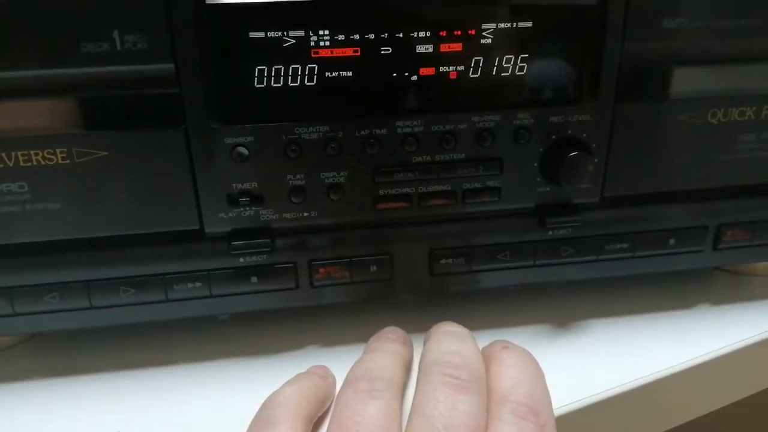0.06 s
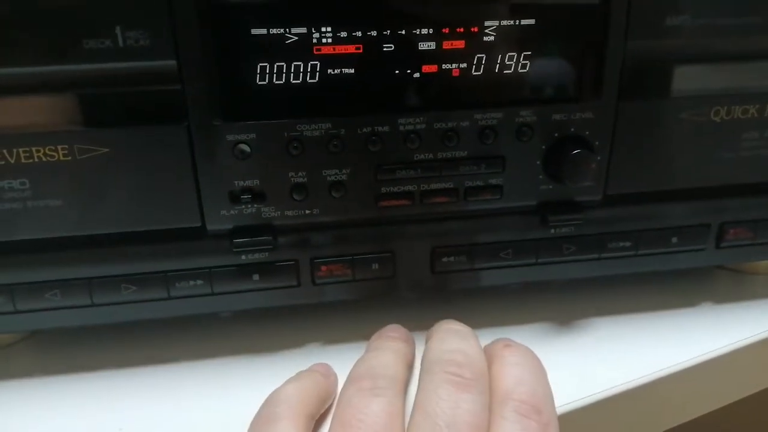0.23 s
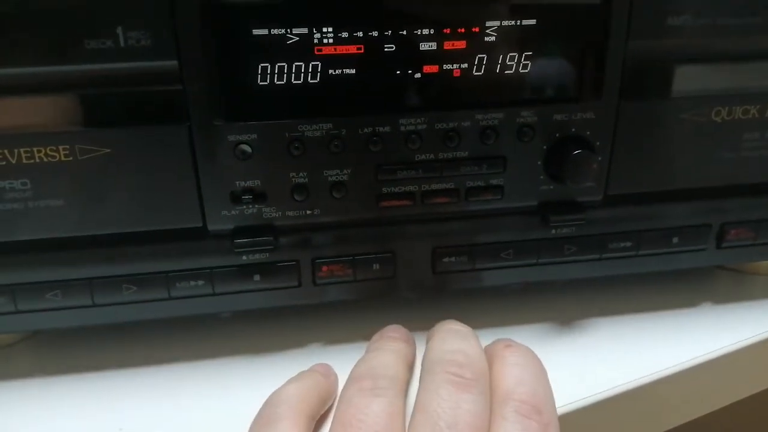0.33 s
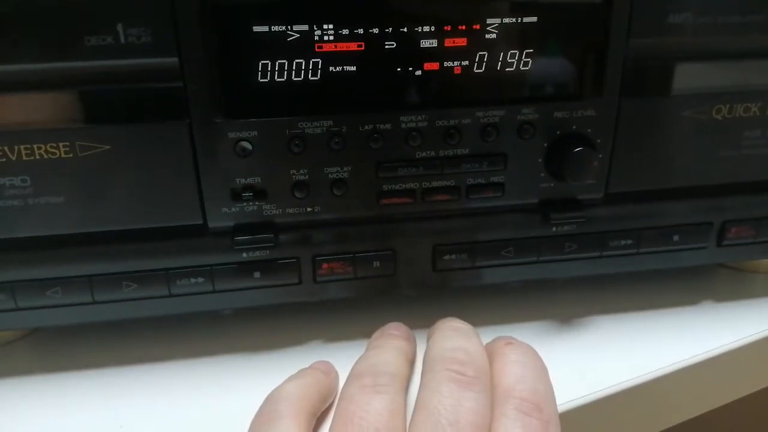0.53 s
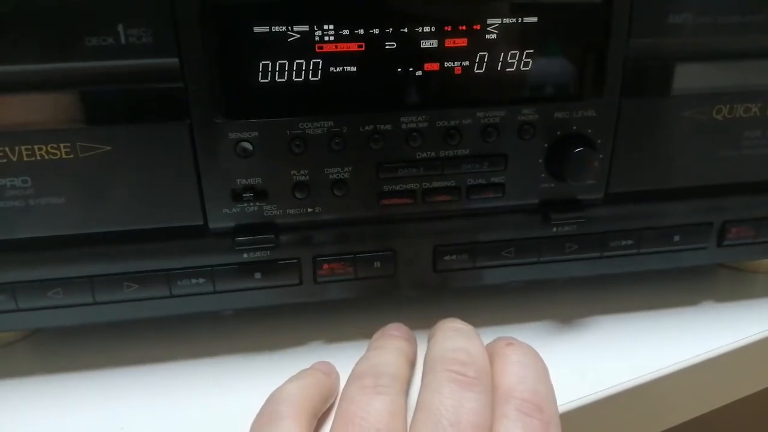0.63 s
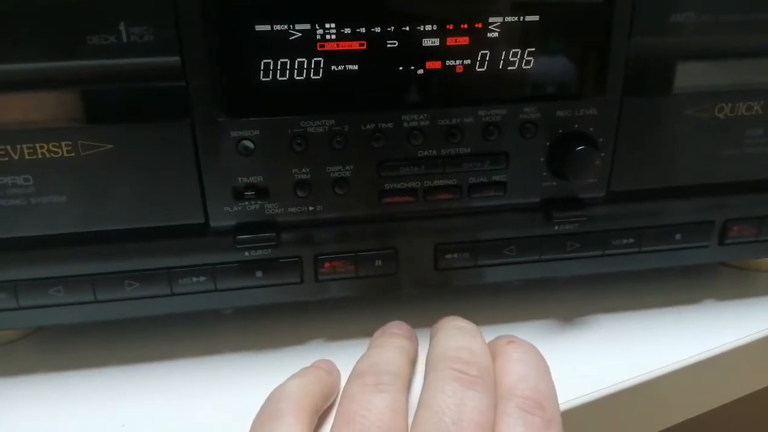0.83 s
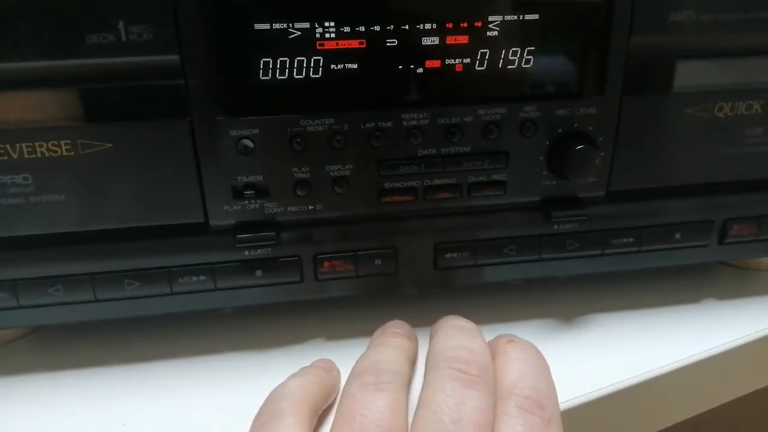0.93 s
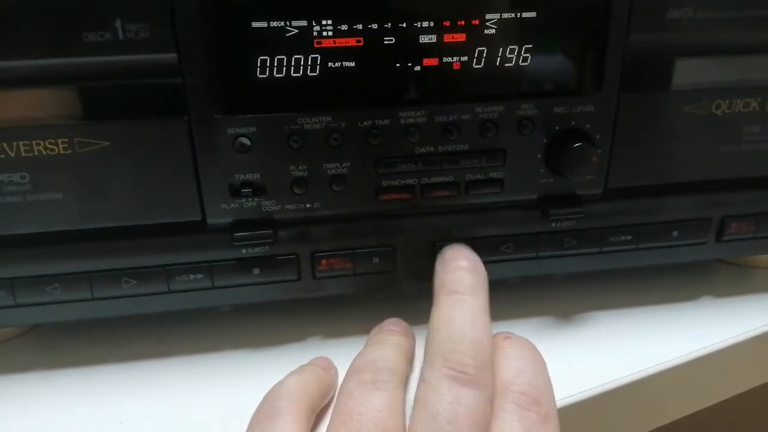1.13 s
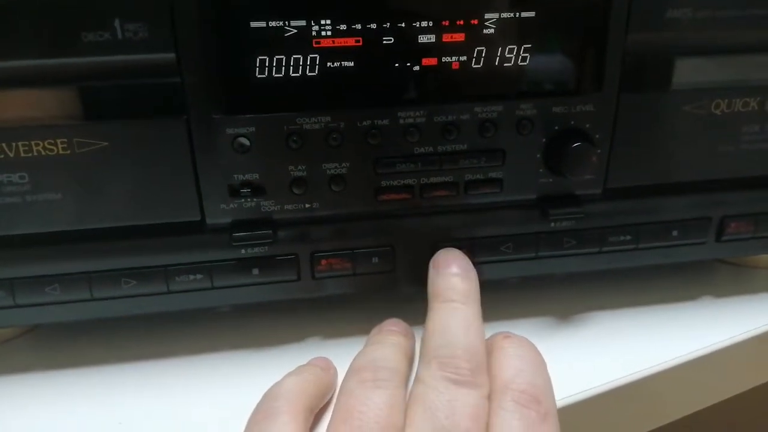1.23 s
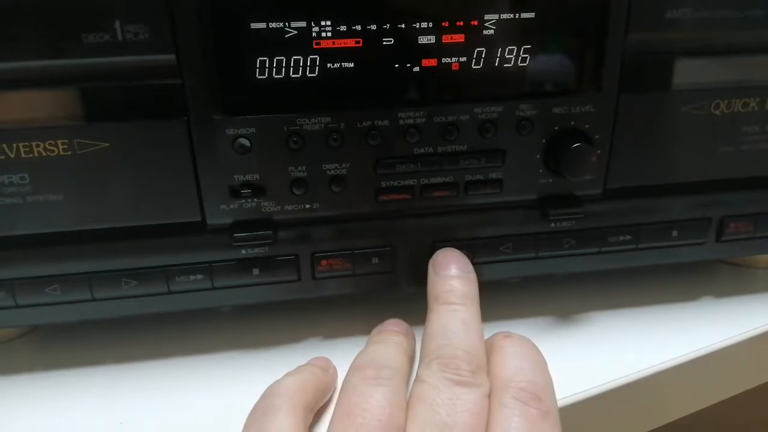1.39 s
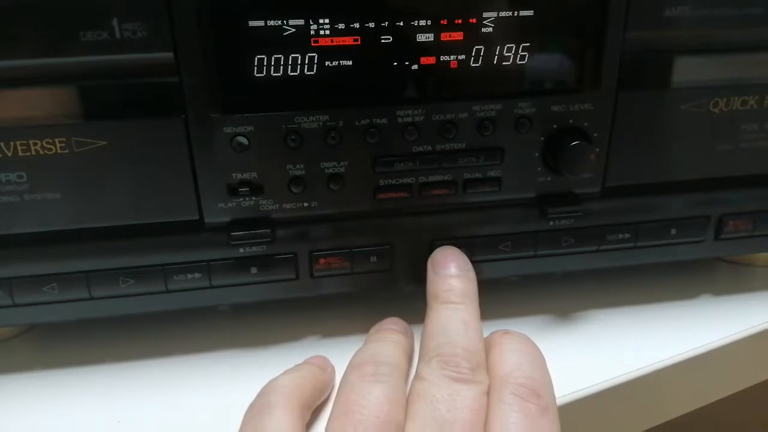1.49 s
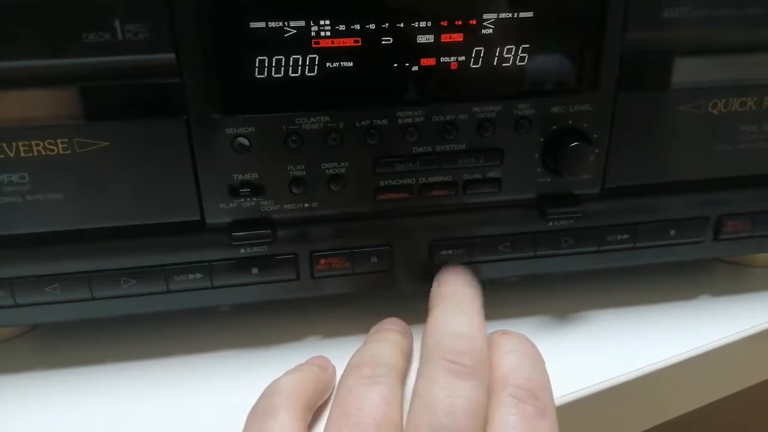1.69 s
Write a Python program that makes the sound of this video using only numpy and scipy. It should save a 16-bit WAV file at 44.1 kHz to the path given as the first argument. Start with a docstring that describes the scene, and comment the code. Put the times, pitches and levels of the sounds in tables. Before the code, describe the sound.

Two clacks of a cassette deck mechanism stopping, followed by a small plastic button click.

```python
"""A cassette deck close to the microphone, in a small hard room, over a low rumble and a hiss.
First the winding transport ticks. It stops with a clack, a rattle of levers and a second clack:
impacts that set the steel chassis ringing, then clamp it. The reels run down, their whirr falling
in pitch, and a motor hums on. Last, a finger presses a small plastic button and lets it go;
each stroke excites the modes of the front panel."""
import sys
import numpy as np
from scipy import signal
from scipy.fft import rfft, irfft, next_fast_len
from scipy.io import wavfile
from scipy.ndimage import map_coordinates

SR = 44100
rng = np.random.default_rng(int(sys.argv[2]) if len(sys.argv) > 2 else 0)


def materialize(psi):
    """Save the field psi as 16-bit PCM at rate SR to the path in sys.argv[1].

    A 1-D psi becomes a single channel; in a 2-D psi each row is a channel.
    """
    bounded = np.clip(np.atleast_2d(psi).T, -1, 1)
    quanta = np.round(bounded * 32767).astype(np.int16)
    wavfile.write(sys.argv[1], SR, quanta)


N = 77175

# Coherence of the two microphone ports, in direct and in diffuse sound: f/Hz, correlation
DIRECT_COHERENCE = [(100, 1), (800, 0.6), (1500, .1), (2600, -0.068), (4000, 0.27), (6500, -0.085),
                    (12000, -0.16)]
DIFFUSE_COHERENCE = [(150, 1), (800, 0.5), (1500, 0), (10000, 0)]


def amp(db):
    """Amplitude ratio: a factor of ten for every 20 dB."""
    return 10 ** (np.asarray(db) / 20)


def fade(t, t60):
    """Exponential decay of a damped vibration, 60 dB in t60 seconds."""
    return amp(-60 * t / t60)


def along(points, hz):
    """Interpolation of (f/Hz, value) points on a logarithmic frequency axis."""
    f, v = np.transpose(points)
    return np.interp(np.log(hz + 1), np.log(f + 1), v)


def curves(rows):
    """Linear interpolation in time: one value per sample for each column after t/s."""
    s, *cols = np.transpose(rows)
    return [np.interp(np.arange(N) / SR, s, c) for c in cols]


def wobble(rate):
    """Slow random modulation: a spline through rate knots a second."""
    return map_coordinates(rng.standard_normal(size=512), [np.arange(N) * rate / SR], mode="wrap")


def add(track, s, sound):
    """Superposition: a sound adds to the track from s seconds on."""
    start = round(s * SR)
    track[:, start:start + sound.shape[1]] += sound[:, :N - start]


def noise(colour, coherence, size, tilt_db=0):
    """Partially coherent stereo noise of rms 1, tilted by tilt_db per octave above 700 Hz."""
    hz = np.fft.rfftfreq(size, 1 / SR)
    angle = np.arccos(np.clip(along(coherence, hz), -1, 1)) / 2
    gain = amp(along(colour, hz) + tilt_db * np.log2(np.maximum(hz, 700)))
    white = rfft(rng.standard_normal((2, size)))
    mid, side = irfft(white * gain * [np.cos(angle), np.sin(angle)], size)
    pair = np.array([mid + side, mid - side])
    return pair / np.sqrt(np.mean(pair ** 2) + 1e-20)


def dense_modes(colour, t60s, coherence, size, tilt_db=0, length=1, attack_s=0.00022):
    """Modal overlap: close modes struck at once merge into noise, each band with its own decay."""
    t, hz = np.arange(size) / SR, np.fft.rfftfreq(size, 1 / SR)
    spectrum = rfft(noise(colour, coherence, size, tilt_db))
    centres, times = np.transpose(t60s)
    bands = [irfft(spectrum * along(np.c_[centres, pick], hz), size) for pick in np.eye(len(centres))]
    ringing = sum(band * fade(t, t60 * length) for band, t60 in zip(bands, times))
    return ringing * (1 - np.exp(-t / attack_s))


def clear_modes(table, attack_s=0.00074):
    """Free vibration as damped sinusoids; lower coherence puts the two ports further out of phase."""
    t = np.arange(SR // 2) / SR
    out = np.zeros((2, len(t)))
    for hz, db, t60 in table:
        lag = np.arccos(np.clip(along(DIRECT_COHERENCE, hz), -1, 1))
        phase = rng.uniform(0, 2 * np.pi) + lag * np.array([[.5], [-.5]])
        out += amp(db) * fade(t, t60) * np.sin(2 * np.pi * hz * t + phase)
    return out * (1 - np.exp(-t / attack_s))


def in_room(sound, wet_db):
    """A small part radiates long waves poorly; the room's reflections add a diffuse tail."""
    # Reverberation spectrum: f/Hz, relative level/dB
    colour = [(100, 15.5), (900, -3), (2300, 3.5), (3400, -4), (5500, 3), (7200, -1), (9000, -4.5),
              (15000, -6.5)]
    # Reverberation time: f/Hz, T60/s
    decay = [(200, 0.73), (900, 0.63), (2500, 0.93), (6000, 0.73), (9000, 0.57), (15000, 0.51)]
    radiation = signal.butter(N=3, Wn=246, btype="high", fs=SR, output="sos")
    direct = signal.sosfilt(radiation, sound)
    tail = dense_modes(colour, decay, DIFFUSE_COHERENCE, size=24576, attack_s=0.0094)
    out = amp(wet_db) * signal.fftconvolve(direct, tail / np.linalg.norm(tail[0]), axes=1)
    add(out, 0, direct)
    return out


def background():
    """Random noise with continuous spectra: a low rumble and the hiss of the running deck."""
    # Envelopes: t/s, level/dB
    rumble_level = [(0, -69.5), (.3, -62), (.6, -60.5), (.76, -57), (.9, -60), (1.05, -65), (1.3, -65.5),
                    (1.4, -57.5), (1.5, -65), (1.68, -62), (1.75, -62)]
    hiss_level = [(0, -63.5), (.7, -65.5), (.95, -63), (1.3, -65), (1.75, -66)]
    # Spectra: f/Hz, relative level/dB
    rumble_colour = [(20, 8), (45, -8), (66, 6), (100, -2.5), (140, 6), (230, -4), (350, -19), (600, -18.5),
                     (2000, -55)]
    hiss_colour = [(20, -19), (150, -12), (300, 1.5), (500, -7.5), (610, -12.5), (660, 5), (740, -10.5),
                   (920, 1.5), (1150, -5), (1500, -9.5), (2200, -11), (3300, -8), (4400, -12.5), (5600, -6),
                   (7200, -10.5), (8200, -21.5), (10200, -17.5), (12000, -23.5), (16000, -16.5)]
    rumble = amp(curves(rumble_level)[0]) * noise(rumble_colour, coherence=[(100, 0.7)], size=N)
    hiss = amp(curves(hiss_level)[0]) * noise(hiss_colour, DIFFUSE_COHERENCE, size=N)
    return rumble + hiss


def motor():
    """Nearly periodic rotation gives a harmonic series: a faint hum that comes up after the stop."""
    # Partials of the hum: harmonic number, level/dB
    harmonics = [(1, -74.5), (2, -73), (3, -82)]
    hum_hz, start_s, rise_s = 147, 0.684, 0.072
    rise = np.clip((np.arange(N) / SR - start_s) / rise_s, 0, 1)
    phase = 2 * np.pi * np.cumsum(hum_hz * (1 + 0.0067 * wobble(7.95))) / SR
    hum = sum(amp(db + 3.5 * wobble(6.28)) * np.sin(k * phase) for k, db in harmonics)
    return rise * np.sqrt(2) * hum


def reels():
    """Pitch follows speed as two reels run down; amplitude and phase modulation roughen the whirr."""
    # Whirr of the fuller reel: t/s, f/Hz, level/dB
    run_down = [(0, 171.2, -69), (.2, 169.8, -61.5), (.25, 176, -67), (.285, 177.7, -48.5),
                (.31, 177.4, -60), (.34, 182.2, -55), (.37, 232.9, -82), (.40, 242.6, -48),
                (.43, 208.5, -69), (.47, 174.7, -54), (.52, 161.9, -55.5), (.565, 152.5, -50),
                (.63, 134.2, -63), (.71, 114.6, -60), (.79, 86.7, -60.5), (.9, 65, -81), (1.0, 59.8, -96)]
    roughness, emptier_ratio, emptier_db = 0.38, 1.3, -13.5  # the emptier reel turns faster
    hz, db = curves(run_down)
    phase = 2 * np.pi * np.cumsum(hz) / SR
    fuller, emptier = [(1 + roughness * wobble(50.2)) * np.sin(ratio * phase + roughness * wobble(61.1))
                       for ratio in (1, emptier_ratio)]
    return amp(db) * np.sqrt(2) * (fuller + amp(emptier_db) * emptier)


def ticks():
    """Periodic impulsive excitation: a faint tick for each turn of the fast reel."""
    # Ticks while winding: t/s, level/dB
    turns = [(0.0269, -53.5), (0.075, -54), (0.1235, -62), (0.1712, -58.5)]
    # Tick spectrum: f/Hz, relative level/dB
    colour = [(500, -27), (2200, -19), (3300, 4), (4500, -10), (6600, -1), (8500, -21), (10500, -17),
              (15000, -19)]
    # Tick damping: f/Hz, T60/s
    decay = [(1000, 0.06), (10000, 0.041)]
    out = np.zeros((2, N))
    for s, db in turns:
        add(out, s, amp(db) * dense_modes(colour, decay, DIRECT_COHERENCE, size=4096, attack_s=0.0018))
    return out


def button():
    """Impact excitation: the button snaps in to its stop, then springs back, ringing the panel twice."""
    # Contacts of each stroke: t/s, level/dB
    press = [(1.4692, -25), (1.4712, -35.5), (1.4750, -39)]
    release = [(1.6709, -34), (1.6720, -36.5)]
    # Contact spectra: f/Hz, relative level/dB
    press_colour = [(100, -25), (450, -34), (950, -16.5), (1400, -15.5), (2100, -19), (2800, -1),
                    (3500, 3.5), (4200, -1.5), (5800, 9), (7500, -8), (9200, -1.5), (11000, -9),
                    (16000, -14)]
    release_colour = [(200, -14), (600, -24), (1000, 9), (1600, -31), (2400, -7.5), (3400, 7.5),
                      (4400, -5.5), (5600, 1), (6400, 1), (7500, 7.5), (9500, -11.5), (13000, -9),
                      (16000, -7)]
    # Contact damping: f/Hz, T60/s
    decay = [(900, 0.09), (3300, 0.027), (6000, 0.014), (12000, 0.014)]
    # Modes of button and front panel: f/Hz, T60/s, level/dB on press, level/dB on release
    panel_modes = [(950, 0.055, -48, -47.5), (1046, 0.21, -77, -51), (2730, .012, -44, -70),
                   (3024, 0.025, -31.5, -46), (3384, 0.039, -37.5, -40), (3840, 0.059, -49.5, -49.5),
                   (4640, .016, -48, -56), (5490, 0.015, -34, -42), (6290, .018, -33, -54),
                   (7390, 0.027, -33.5, -43), (8780, 0.02, -38, -60)]
    hz, t60, press_db, release_db = np.transpose(panel_modes)
    out = np.zeros((2, N))
    for snaps, colour, panel_db in (press, press_colour, press_db), (release, release_colour, release_db):
        for s, db in snaps:
            snap = dense_modes(colour, decay, DIRECT_COHERENCE, size=4096, attack_s=0.00037)
            add(out, s, amp(db) * in_room(snap, wet_db=-9.5))
        panel = clear_modes(zip(hz, panel_db, t60), attack_s=0.00017)
        add(out, snaps[0][0], in_room(panel, wet_db=-15.5))
    return out


def transport():
    """Impact and damping: levers knock home; the hardest blow rings the chassis until it is clamped."""
    # Contacts of levers and head carrier: t/s, level/dB, tilt/(dB per octave), decay time factor
    contacts = [(0.2051, -31.5, 7, 1.2), (0.2091, -22.5, 2.5, 0.96), (0.2130, -24.5, 0, 0.93),
                (0.2165, -32.5, 1, 1.45), (0.2264, -32.5, 3.5, 0.58), (0.2400, -46, 15, 1.3),
                (0.251, -41, 11, 2.4), (0.2640, -31.5, 1, 1.75), (0.2695, -40.5, 3, 1.8),
                (0.2770, -35, 0, 2.4), (0.3228, -33.5, 9, 1.2), (0.3261, -27, -2.5, 1.14),
                (0.3295, -38.5, 0.5, 0.51), (0.3340, -33, 0.5, 1.1), (0.3408, -32, 3, 1.44),
                (0.3480, -43, 6, 0.67)]
    # Knock spectrum before the tilt: f/Hz, relative level/dB
    colour = [(60, -8), (170, -3), (310, -9.5), (400, -18.5), (510, -16.5), (660, -3), (880, 2), (1050, -1),
              (1350, -1), (1650, -8), (2700, -1.5), (2950, -3), (3350, 4), (3800, -8.5), (5500, -5),
              (7100, -1.5), (8000, -13), (12000, -14.5), (16000, -25)]
    # Knock damping before the factor: f/Hz, T60/s
    decay = [(200, 0.063), (900, 0.071), (3000, .04), (7000, 0.039), (14000, 0.037)]
    # Free modes of the steel chassis and springs: f/Hz, relative level/dB, T60/s
    chassis_modes = [(835, -8, .42), (932, -14, .25), (1122, -20, .35), (1308, -15, .2), (1427, -20, .3),
                     (2245, -23, .7), (2834, -18, .25), (3358, -13, .22), (3410, -17, .2), (6610, -21, .3),
                     (6884, -19, .25)]
    chassis_db, clamp_s, clamp_t60_s = -24, 0.31, 0.31  # the second clack adds damping
    out = np.zeros((2, N))
    for s, db, tilt_db, length in contacts:
        knock = dense_modes(colour, decay, DIRECT_COHERENCE, size=8192, tilt_db=tilt_db, length=length)
        add(out, s, amp(db) * in_room(knock, wet_db=-4.5))
    struck_s = max(contacts, key=lambda row: row[1])[0]
    chassis = clear_modes(chassis_modes)
    clamped_for = np.maximum(struck_s + np.arange(chassis.shape[1]) / SR - clamp_s, 0)
    add(out, struck_s, amp(chassis_db) * chassis * fade(clamped_for, clamp_t60_s))
    return out


def scene():
    """Linear superposition of all sources at the two microphone ports."""
    return transport() + ticks() + button() + reels() + motor() + background()


def record(dry):
    """Frequency response: each port colours the sound in its own way, up to a common band limit."""
    # Imbalance of the ports: f/Hz, left minus right level/dB
    balance = [(80, 0), (250, 2), (800, 0.5), (1400, 0), (2500, -1.5), (3500, -8.5), (5200, -7),
               (6700, 6.5), (9000, 0), (14000, 0)]
    top_hz = 16000
    size = next_fast_len(N + SR // 2)
    hz = np.fft.rfftfreq(size, 1 / SR)
    ports = amp(along(balance, hz) * np.array([[.5], [-.5]]))
    return irfft(rfft(dry, size) * ports * (hz < top_hz), size)[:, :N]


dry = scene()
out = record(dry)
materialize(out)
```